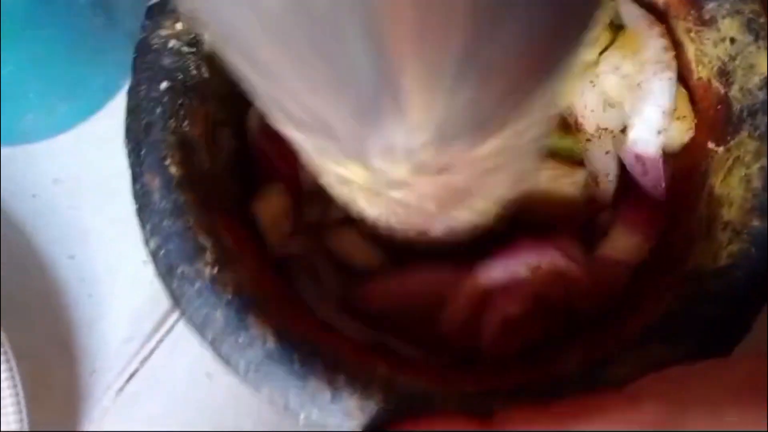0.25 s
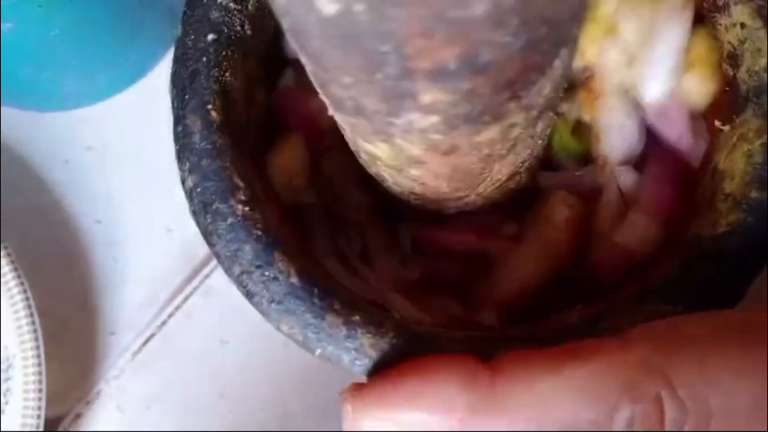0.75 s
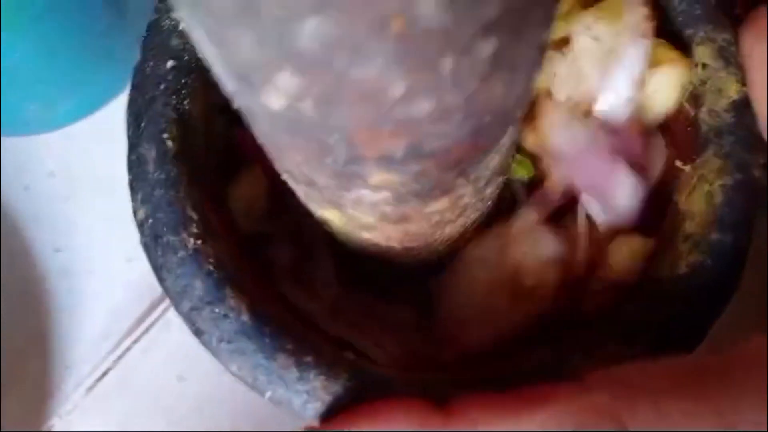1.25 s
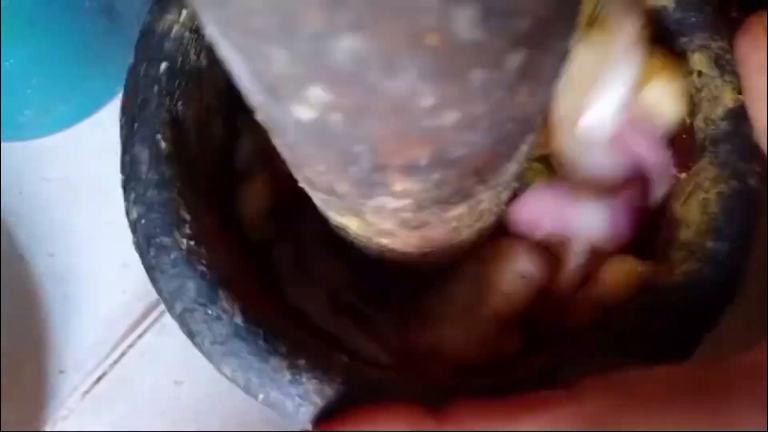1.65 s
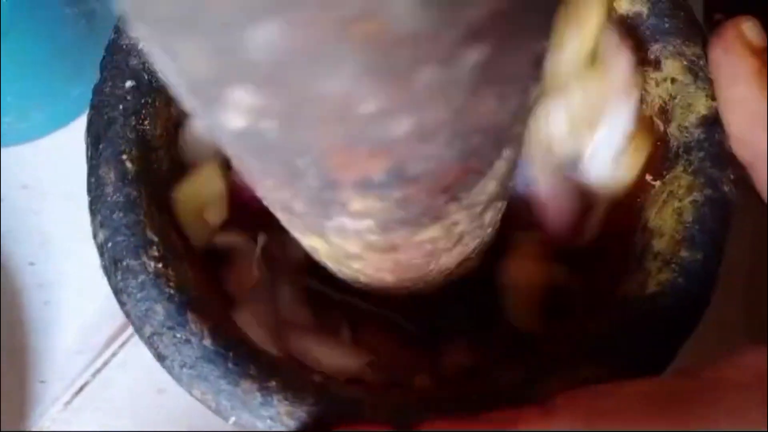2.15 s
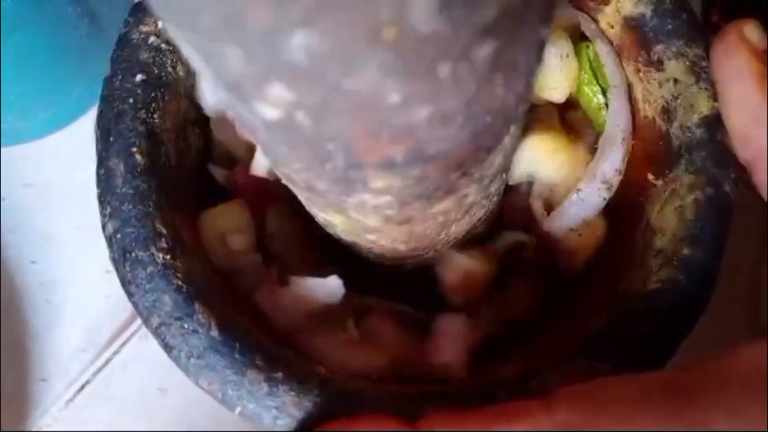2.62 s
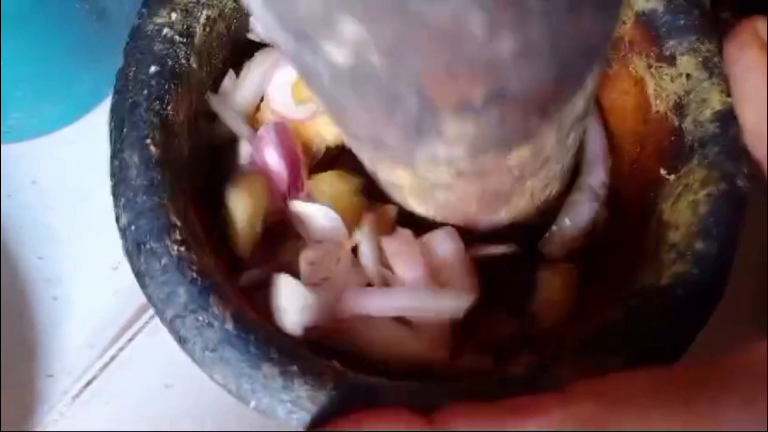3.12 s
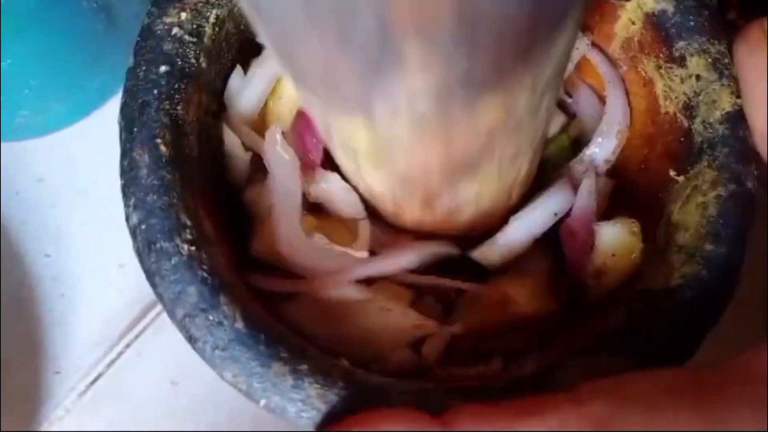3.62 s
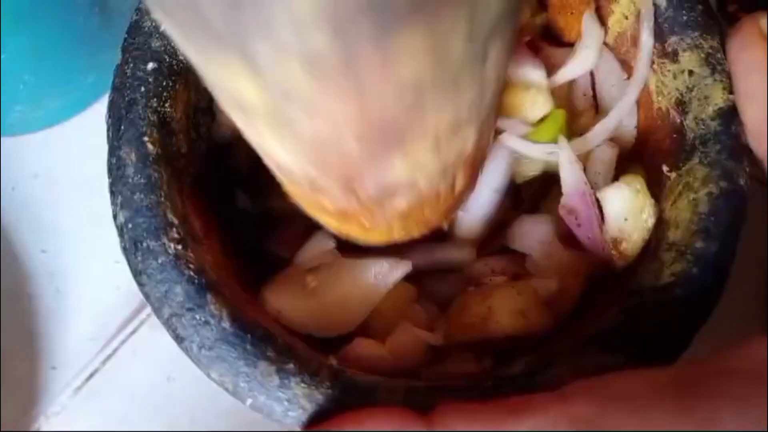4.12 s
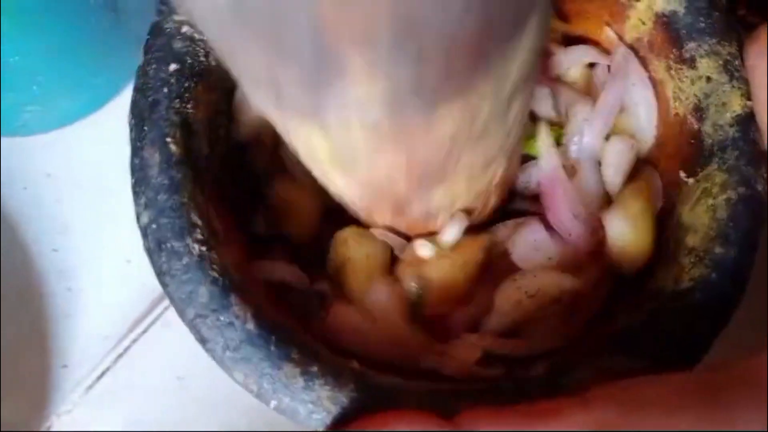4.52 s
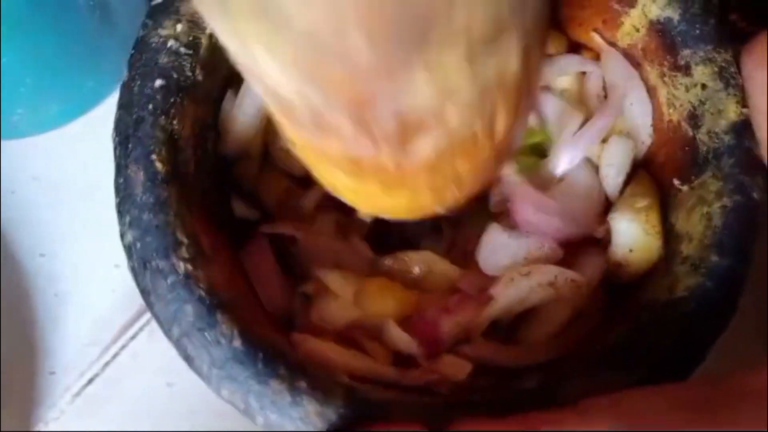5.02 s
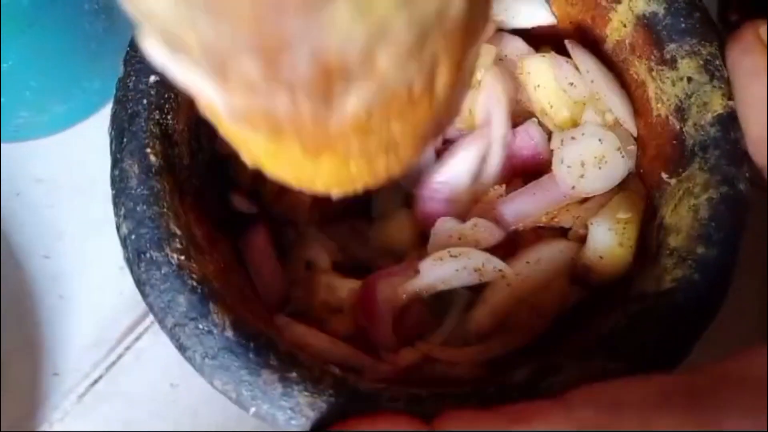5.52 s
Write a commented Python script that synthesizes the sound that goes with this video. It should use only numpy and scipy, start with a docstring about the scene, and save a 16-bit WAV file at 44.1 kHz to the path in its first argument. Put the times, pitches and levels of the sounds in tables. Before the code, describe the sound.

Close to a small microphone, a heavy stone pestle strikes chopped onion and garlic in a stone mortar, thirteen blows about every 0.45 seconds. Each blow is a sharp stony crack with a juicy crunch and a short low thud through the counter. Faint ticks and rustling fall between blows; behind them a steady high insect trill and faint lower chirps fill a small kitchen.

```python
"""Stone pestle and mortar

A stone pestle pounds chopped vegetables, close to a small microphone: noise puffs crack through the bowl's
colour, dense snaps crunch, decaying counter modes thud, dull noise grinds; faint high-passed noise ticks.
Noise bands make the insects outside, wavering sines a lower caller; patchy treble noise flickers, and a
low rumble comes and goes over air."""
import sys
import numpy as np
from scipy import signal
from scipy.io import wavfile
from scipy.ndimage import uniform_filter1d

SR = 44100
rng = np.random.default_rng(int(sys.argv[2]) if len(sys.argv) > 2 else 0)


def amplitude_ratio(level_db):
    """Convert a level in decibels to the matching linear amplitude (field) ratio."""
    exponent = np.asarray(level_db, float) / 20
    return 10 ** exponent


def store_wav(level_fs):
    """Save 16-bit WAV to argv[1]."""
    pcm = np.round(np.clip(np.atleast_2d(level_fs), -1, 1) * 32767)
    wavfile.write(sys.argv[1], SR, pcm.T.astype(np.int16))


N = 254016
BINS_HZ = np.fft.rfftfreq(1024, 1 / SR)

# crushing under each blow: (time [s], crunch level [dB], swell [ms per 10 dB], hollow scrape level [dB],
# juicy hiss level re crunch [dB])
SQUEEZES = [(.15, -29.5, 13, -53, 8.5), (.585, -15.5, 9, -61, -3), (1.064, -21.5, 5, -41, 4),
            (1.51, -20.5, 7, -35.5, 7.5), (1.967, -20.5, 14.5, -48, -1.5), (2.426, -21, 5, -54, 2.5),
            (2.879, -27.5, 23, -44, 1.1), (3.345, -29.5, 18, -38.5, 5.5), (3.779, -22.5, 16.5, -43, 1),
            (4.219, -15, 10, -52, -3), (4.645, -21.5, 5.5, -41, -6), (5.086, -23.5, 10, -45, 0.5),
            (5.548, -29.5, 11, -61, -4)]
# thuds into the counter: (time [s], body level [dB], deep level [dB], low level [dB], upper level [dB],
# woody level [dB])
THUDS = [(0.162, -41.5, -43, -27.5, -34.5, -35.5), (0.597, -46.5, -36, -33, -52, -47.5),
         (1.061, -23.5, -33, -26, -29.5, -26.5), (1.507, -25, -36, -23.5, -26, -21.5),
         (1.97, -37.5, -36, -26, -47, -35), (2.431, -33, -27.5, -17, -33.5, -24.5),
         (2.881, -49.5, -41, -34, -63, -51), (3.339, -62, -54, -40, -42.5, -60.5),
         (3.779, -37.5, -39.5, -30, -28, -38.5), (4.212, -27, -49.5, -42, -24.5, -32),
         (4.641, -26, -40, -27, -24, -26), (5.084, -30, -40.5, -43, -23, -29.5),
         (5.569, -59, -42, -31, -49, -34.5)]
# colour of a crack through bowl and microphone: (frequency [Hz], level [dB per Hz])
BOWL = [(710, -30.5), (1200, -14.5), (1540, -7.5), (1860, -10.5), (2140, -4), (3510, 2.5), (3710, -1),
        (4170, -6.5), (6620, -6), (9330, -36.5), (10500, -41), (11900, -26), (13900, -22.5), (15600, -35)]


def evened(x):
    """Scales to rms 1."""
    return x / np.sqrt(np.mean(x ** 2) + 1e-20)


def read(points, hz):
    """Reads a spectrum on a log-frequency axis."""
    f, value = np.transpose(points)
    return np.interp(np.log(hz + 1), np.log(f + 1), value)


def curve(rows):
    """Reads a (time, level) curve at every sample."""
    s, value = np.transpose(rows)
    return np.interp(np.arange(N) / SR, s, value)


def add(mix, s, sound):
    """Mixes a sound in at a time."""
    part = mix[round(s * SR):][:len(sound)]
    part += sound[:len(part)]


def resonate(x, hz, width_hz):
    """Shifts hz down to zero, smooths, and shifts back: a resonance of gain 1."""
    turn = np.exp(2j * np.pi * hz * np.arange(len(x)) / SR)
    r = np.exp(-np.pi * width_hz / SR)
    return 2 * (turn * signal.lfilter([1 - r], [1, -r], x / turn)).real


def causal(points, size=4096):
    """Minimum-phase impulse response of a spectrum."""
    hz = abs(np.fft.fftfreq(size, 1 / SR))
    log_gain = np.log(amplitude_ratio(np.maximum(read(points, hz), -90)))
    return np.fft.ifft(np.exp(signal.hilbert(log_gain).conj())).real[:size // 2]


def noise(colour_db, patchy_db, flicker_db=0.):
    """Random short-time spectra with drifting patches and a flicker shared by all bins."""
    real, imag, patches = rng.standard_normal((N // 256 + 5, 513, 3)).T
    flicker = evened(uniform_filter1d(patches[0], size=4))
    patches = uniform_filter1d(patches, size=8, axis=0)
    patches = evened(uniform_filter1d(patches, size=12, axis=1))
    field = amplitude_ratio(colour_db[:, None] + patchy_db * patches + flicker_db * flicker)
    return evened(signal.istft((real + 1j * imag) * field, nperseg=1024, noverlap=768)[1][:N])


def wander(size):
    """Slow chance, rms 1."""
    return evened(uniform_filter1d(uniform_filter1d(rng.standard_normal(N), size), size))


def hollow(x):
    """The air inside the bowl rings briefly and passes nothing deep."""
    # air resonances: (frequency [Hz], width of the narrower of two stages [Hz], level [dB])
    air_modes = [(630, 750, -15), (843, 196, 8.5), (933, 244, 0.5), (1230, 560, -4), (1546, 460, -6.5)]
    x = signal.sosfilt(signal.butter(4, 595, "high", fs=SR, output="sos"), x)
    return sum(amplitude_ratio(db) * resonate(resonate(x, hz, width_hz), hz, 2 * width_hz)
               for hz, width_hz, db in air_modes)


def cracks():
    """Each crack is a noise puff coloured by the bowl, with its own ring and knock; weak ones are duller."""
    # loud cracks: (time of peak [s], nominal peak level [dB], nominal hollow knock level [dB],
    # nominal length [ms])
    loud_cracks = [(.1255, -29, -36, 6.46), (.1428, -18, -24, 2.4), (.1496, -6, -25.5, 4.9),
                   (.5793, -33, -31, 3.5), (.5865, -27, -23, 1.26), (1.0635, -8, -33, 2.1),
                   (1.0665, -6, -12.5, 2.9), (1.0695, -15, -11.5, 1.89), (1.5074, -13.5, -28, 2.4),
                   (1.5164, -6.5, -18.5, 1.44), (1.5248, -18, -35, 3), (1.9426, -9.5, -33, 3.35),
                   (1.9498, -16, -26.5, 3.5), (1.9604, -23, -45, 1.46), (1.9711, -5.5, -26, 2.7),
                   (2.4242, -9.5, -20, 3.5), (2.4275, -7.5, -32, 2.03), (2.8625, -19.5, -44, 2.4),
                   (2.874, -20.5, -38, 4.2), (2.8783, -21, -44, 3.34), (2.8884, -20, -36, 1.56),
                   (3.3357, -18, -32, 2.1), (3.3412, -7, -45, 3.36), (3.345, -10.5, -38, 3.1),
                   (3.3502, -11.5, -47, 2.75), (3.3563, -8.5, -55, 1.9), (3.3742, -15.5, -53, 1.9),
                   (3.7466, -23, -55, 3.5), (3.7684, -22, -31, 5.46), (3.7797, -9.5, -23, 2.37),
                   (3.7871, -17, -49, 1.2), (4.2021, -33, -29, 1.8), (4.2112, -13, -26.5, 1.8),
                   (4.223, -20, -19.5, 2.3), (4.2271, -15, -48, 1.56), (4.6475, -16.5, -19.5, 5.2),
                   (4.6513, -15, -25, 1.08), (5.0829, -14, -43, 1.54), (5.0885, -5.5, -31, 2.9),
                   (5.0922, -6, -28, 3.8), (5.5427, -7, -35, 2.13), (5.5465, -12, -33, 2.6),
                   (5.552, -19, -30, 2.1)]
    ring_hz, ring_spread = 3223, .06  # pitch varies from piece to piece
    out, t = np.zeros(N), np.arange(768) / SR
    # soft pieces break without the finest hiss
    bowl = signal.sosfilt(signal.butter(3, 6800, fs=SR, output="sos"), causal(BOWL)[:1024])
    rows = loud_cracks + crumbs()
    for (s, db, knock_db, ms), puff in zip(rows, rng.standard_normal((len(rows), 768))):
        hz = ring_hz * (1 + ring_spread * puff[0])
        peak_s = np.clip(ms, .3, 8) / 1000 * .45
        burst = puff * t / peak_s * np.exp(-t / peak_s)
        wide = signal.fftconvolve(burst, bowl)
        bright = amplitude_ratio(0.59 * db - 2.0) * wide + 1.42 * resonate(wide, hz, 490)
        knock = hollow(np.pad(burst, (0, 1023)))
        bright = amplitude_ratio(db - 1.67) * bright / abs(bright).max()
        knock = amplitude_ratio(knock_db - 0.5) * knock / abs(knock).max()
        add(out, s - peak_s - .0003, bright + knock)
    return out


def crumbs():
    """Rows for small cracks: five at random round every blow, weaker the further from it."""
    centre_db, spread_db, knock_re_crack_db, mean_ms = -32, 5, -15.5, 2.57
    lead_swells, trail_s, fade_db_per_s = 1.6, .075, -90
    when, size, span = rng.random((len(SQUEEZES), 5, 3)).T
    s, _, swell_ms = np.transpose(SQUEEZES)[:3]
    lead_s = lead_swells * swell_ms / 1000
    late_s = (lead_s + trail_s) * when - lead_s
    db = centre_db + spread_db * (2 * size - 1) + fade_db_per_s * abs(late_s)
    rows = [s + late_s, db, db + knock_re_crack_db, mean_ms * (.5 + span)]
    return list(np.reshape(rows, (4, -1)).T)


def crush():
    """Dense uneven snaps swell and fade about equally fast around each blow, over a patchy rustle."""
    # pieces shifting in the bowl: (time [s], level [dB])
    rustle_level = [(0.0, -88), (1.67, -59), (2.31, -64), (2.63, -53.5), (3.24, -59), (3.56, -54),
                    (4.59, -60), (5.18, -55), (5.76, -54)]
    # their colour: (frequency [Hz], level [dB per Hz])
    rustle_colour = [(1200, -71), (1800, -7), (2400, -4.5), (3050, 5.5), (3600, -7), (4300, -17),
                     (6000, -22), (7500, -28), (9000, -60)]
    snaps_per_s = 3500
    sizes = amplitude_ratio(1.57 * np.minimum(rng.exponential(1, N), 5))
    snaps = sizes * (rng.random(N) < snaps_per_s / SR) * rng.standard_normal(N)
    snaps = snaps * amplitude_ratio(2.16 * wander(size=130))  # clumps
    crunch = evened(signal.oaconvolve(snaps, causal(BOWL))[:N])
    scrape = evened(hollow(snaps))
    hiss = signal.sosfiltfilt(signal.butter(3, 4600, "high", fs=SR, output="sos"), crunch)
    t = np.arange(N) / SR
    out = amplitude_ratio(curve(rustle_level)) * noise(read(rustle_colour, BINS_HZ), patchy_db=6.5, flicker_db=-0.5)
    for s, db, swell_ms, scrape_db, hiss_db in SQUEEZES:
        away_ms = abs(t - s) * 1000
        shape = amplitude_ratio(-10 * away_ms / (swell_ms * np.where(t < s, 1, 0.99)))
        # juice hisses earlier than the crunch: slower swell, faster fall
        juice = amplitude_ratio(db + hiss_db - 10 * away_ms / (swell_ms * np.where(t < s, 1.23, 0.83)))
        out = out + shape * (amplitude_ratio(db) * (crunch - hiss) + amplitude_ratio(scrape_db) * scrape) + juice * hiss
    return out


def counter(rows, soft_s=0., dull_hz=np.inf):
    """Counter modes build up under the weight, hold, then die ever faster, wobbling at random."""
    # modes of the counter: (frequency [Hz], level [dB], nominal t60 [s])
    modes = [(91.9, 13, 0.23), (96, -10, 0.28), (151.8, -8, 0.32), (195.7, -11.5, 0.36), (236.8, 2.5, 0.28),
             (292, -4, 0.26), (321.2, -6.5, 0.13), (395, -14.5, 0.45), (445, -11.5, 0.34), (509, -7, 0.17),
             (654, -26, 0.25), (725, -6.5, 0.21), (805, -45, 0.58), (889, -29, 0.31), (1187, -45, 0.11),
             (1440, -20, 0.32)]
    deep_hz, low_hz, upper_hz, woody_hz = 130, 210, 270, 360  # group edges
    out, t = np.zeros(N), np.arange(SR // 2) / SR
    hz, mode_db, t60_s = np.transpose(modes)[:, :, None]
    woody = hz > woody_hz
    shakes = rng.standard_normal((len(rows), len(modes), 2, 90))
    rise = (1 - np.exp(-t * hz / 1.15)) ** np.where(hz < deep_hz, 5, 2)  # the deepest come late
    rise = rise * (1 - np.exp(-t / (soft_s + 1e-9))) / (1 + (hz / dull_hz) ** 4)
    groups = [hz < deep_hz, hz < low_hz, hz < upper_hz, hz < woody_hz]
    for (s, body_db, deep_db, low_db, upper_db, woody_db), shake in zip(rows, shakes):
        ring = 0.72 + 0.07 * max(body_db + 31.5, 0)  # t60 factor, longer when the body is loud
        part_db = np.select(groups, [deep_db, low_db, body_db, upper_db], woody_db)
        wobble = uniform_filter1d(shake[:, 0] + 1j * shake[:, 1], size=3)
        wobble = signal.resample(wobble, len(t), axis=1)
        # each blow lands on another spot
        landed_hz = hz * (1 + np.where(woody, .05, .008) * shake[:, 1, :1])
        steady = np.where(woody, .25, .9) * np.exp(9j * shake[:, 0, :1])
        loose = np.where(woody, .8, .55) * wobble
        rings = ((steady + loose) * np.exp(2j * np.pi * landed_hz * t)).real
        decay = amplitude_ratio(mode_db + part_db - 60 * (t / (ring * t60_s)) ** 1.134)
        add(out, s, (decay * rise * rings).sum(0))
    return out


def thuds():
    """Each blow drives the counter's modes."""
    return counter(THUDS)


def late_thuds():
    """Soft, dull low thuds and late tails after some blows, from the same modes with a slower rise."""
    # late thuds: (time [s], body level [dB], deep level [dB], low level [dB], upper level [dB],
    # woody level [dB])
    late_rows = [(1.16, -53, -36, -30, -58, -30), (1.59, -38, -59, -50, -21, -49),
                 (2.51, -39, -55, -41, -44, -32.5), (4.33, -36, -67, -52, -56, -51),
                 (4.39, -58, -76, -63, -58, -30), (4.759, -59, -76, -56, -30, -33)]
    return counter(late_rows, soft_s=0.023, dull_hz=600)


def grind():
    """The pestle grinds on the stone: lumpy, dull noise holds after each thud and then stops."""
    re_woody_db, t60_s, hold = -30.5, 0.18, 1.54
    t, envelope = np.arange(SR // 2) / SR, np.zeros(N)
    for s, *_, woody_db in THUDS:
        decay = amplitude_ratio(woody_db + re_woody_db - 60 * (t / t60_s) ** hold)
        add(envelope, s, decay * np.minimum(t / 0.0047, 1))
    stone = resonate(rng.standard_normal(N), 610, 730)
    stone = evened(signal.lfilter([1, -.6], [1], stone))
    return envelope * amplitude_ratio(6.7 * wander(size=400)) * stone


def ticks():
    """Very short, faint high-passed noise ticks."""
    # ticks: (time [s], peak level [dB])
    tick_rows = [(0.2428, -40), (2.6618, -40), (2.7701, -40), (2.8194, -48), (2.9294, -57), (3.416, -38),
                 (5.2041, -38), (5.3627, -44)]
    decay_s, edge_hz = 0.00098, 7000
    out, t = np.zeros(N), np.arange(256) / SR
    sos = signal.butter(1, edge_hz, "high", fs=SR, output="sos")
    for (s, db), puff in zip(tick_rows, rng.standard_normal((len(tick_rows), 256))):
        tick = signal.sosfilt(sos, puff * np.exp(-t / decay_s))
        add(out, s, amplitude_ratio(db) * tick / abs(tick).max())
    return out


def room(x):
    """Sparse reflections of random sign, each band dying at its own speed."""
    # reverberation: (frequency [Hz], t60 [s])
    room_t60 = [(250, 0.43), (1000, 0.31), (3000, 0.34), (6500, 0.22), (9000, 0.07)]
    taps, slots = np.zeros(SR // 2), np.arange(200, SR // 2 - 20, 20)
    taps[slots + rng.integers(0, 20, len(slots))] = rng.choice([-1., 1.], len(slots))
    hz, t, z = signal.stft(taps, SR, nperseg=256)
    decay = amplitude_ratio(-60 * t / read(room_t60, hz)[:, None])
    tail = signal.istft(z * decay, SR, nperseg=256)[1]
    return signal.fftconvolve(x, tail / np.linalg.norm(tail))[:N]


def insects_and_treble():
    """Many callers blur into steep-sided, patchy noise bands; noise bands above 10 kHz share their level."""
    # noise bands, insects below 10 kHz and plain treble above: (frequency [Hz], nominal width [Hz],
    # level [dB])
    bands = [(2650, 21, -61), (3206, 120, -9), (3660, 42, -37), (4030, 110, -4.5), (4091, 88, 0.5),
             (3973, 270, -9), (4190, 270, -9.5), (4900, 134, -10), (5050, 31, 4.5), (5425, 540, -6.5),
             (5476, 59, -1), (6146, 106, -7), (6470, 800, -18.5), (7940, 400, -32), (8550, 500, -47),
             (10900, 220, -24), (11720, 77, -19.5), (12450, 310, -24)]
    # level of all bands before a 2 dB lift: (time [s], level [dB])
    bands_level = [(0.0, -46.5), (.4, -45), (1.03, -46), (2.04, -45), (3.8, -44.5), (4.6, -46),
                   (4.9, -44.5), (5.76, -44.5)]
    power = sum(amplitude_ratio(2 * db) * np.exp(-(abs(BINS_HZ - hz) / (0.44 * width_hz)) ** 1.64)
                for hz, width_hz, db in bands)
    blur = noise(10 * np.log10(power + 1e-9), patchy_db=1.5, flicker_db=0.54)
    return amplitude_ratio(curve(bands_level) + 2.0) * blur


def flickering_treble():
    """Patchy, flickering treble noise above 11.5 kHz."""
    # treble noise: (time [s], level [dB])
    treble_level = [(0.0, -62.5), (0.46, -62.5), (1.17, -68), (2.53, -71), (2.65, -66.5), (3.93, -65),
                    (4.52, -67.5), (5.44, -70), (5.76, -75)]
    # its colour: (frequency [Hz], level [dB per Hz])
    treble_colour = [(11500, -32), (12200, -5), (13100, -1), (13900, -11), (15400, -18), (15750, -38)]
    colour_db = read(treble_colour, BINS_HZ) - 40 * (BINS_HZ < 11500)
    return amplitude_ratio(curve(treble_level)) * noise(colour_db, patchy_db=3.5, flicker_db=4.5)


def chirps():
    """A low caller gives short, slightly wavering sine notes, about four a second."""
    # notes: (time of middle [s], level [dB], length [s])
    notes = [(0.067, -55.5, 0.16), (0.26, -59, 0.074), (0.402, -64, 0.075), (0.514, -55.5, 0.088),
             (0.76, -58.5, 0.14), (0.947, -58.5, 0.13), (1.19, -61, 0.098), (1.41, -59, 0.18),
             (1.663, -64.5, 0.049), (1.887, -64.5, 0.24), (2.136, -59, 0.063), (2.356, -58.5, 0.073),
             (2.588, -61, 0.14), (2.825, -52.5, 0.081), (3.02, -55.5, 0.074), (3.287, -55, 0.05),
             (3.49, -56.5, 0.13), (3.72, -61, 0.12), (3.99, -55, 0.12), (4.173, -56.5, 0.14),
             (4.443, -56.5, 0.15), (4.663, -66, 0.12), (4.963, -60.5, 0.29), (5.386, -59.5, .09),
             (5.594, -59, .06)]
    t = np.arange(N) / SR
    envelope = sum(amplitude_ratio(db) * np.exp(-abs(2 * (t - s) / length_s) ** 2.1) for s, db, length_s in notes)
    turns = np.cumsum(1932 + 16 * wander(size=300)) / SR  # Hz
    flutter = amplitude_ratio(2.5 * wander(size=350))
    return np.sqrt(2) * envelope * flutter * np.sin(2 * np.pi * turns)


def rumble():
    """Low coloured noise that comes and goes."""
    # rumble: (time [s], level [dB])
    rumble_level = [(0.0, -59.5), (0.3, -50), (0.45, -56), (1.06, -72), (1.17, -53), (1.96, -67),
                    (2.34, -46.5), (3.21, -44), (3.7, -45.5), (3.95, -60.5), (4.62, -74.5), (5.76, -64)]
    # its colour: (frequency [Hz], level [dB per Hz])
    rumble_colour = [(18, -57), (30, -20), (59, -44), (129, 4), (167, -5.5), (204, -20.5), (241, 0.5),
                     (271, -35), (500, -35), (650, -90), (1100, -120)]
    return amplitude_ratio(curve(rumble_level)) * noise(read(rumble_colour, BINS_HZ), patchy_db=-0.5)


def air():
    """Kitchen air: coloured noise at one level."""
    # colour: (frequency [Hz], level [dB per Hz])
    air_colour = [(12, -50), (30, 1), (55, -16.5), (120, -7), (400, -21), (1500, -24.5), (3000, -28),
                  (4550, -30), (6000, -27.5), (7400, -46), (9400, -75), (10100, -42), (15500, -55),
                  (15800, -67)]
    return amplitude_ratio(-58) * noise(read(air_colour, BINS_HZ), patchy_db=2.0)


def scene():
    """Blows and ticks with their room, over insects, treble noise, chirps, rumble and air."""
    near = cracks() + crush() + ticks()
    wet = near + amplitude_ratio(-16.5) * room(near)
    weight = thuds() + late_thuds() + grind()
    background = insects_and_treble() + flickering_treble() + chirps() + rumble() + air()
    return (wet + weight + background)[None]


def top_cut(x):
    """Nothing passes above the cut-off."""
    return signal.sosfilt(signal.butter(12, 15780, fs=SR, output="sos"), x)


def record(dry):
    """A small microphone drops the deepest bass; gain control ducks fast on each blow, then recovers."""
    dry = signal.sosfilt(signal.butter(2, 48, "high", fs=SR, output="sos"), dry)
    power_db = 10 * np.log10(abs(uniform_filter1d(dry[0] ** 2, size=220)) + 1e-12)
    fall_db = np.arange(N) * 104.0 / SR  # the detector falls 104 dB/s
    held_db = np.maximum.accumulate(power_db + fall_db) - fall_db
    over_db = np.maximum(held_db + 26.5, 0)
    lagged_db = signal.lfilter([1 / 150], [1, 1 / 150 - 1], over_db)  # lag of 150 samples
    mix = dry / amplitude_ratio(0.28 * lagged_db)
    return top_cut(mix)


dry = scene()
out = record(dry)
store_wav(out)
```